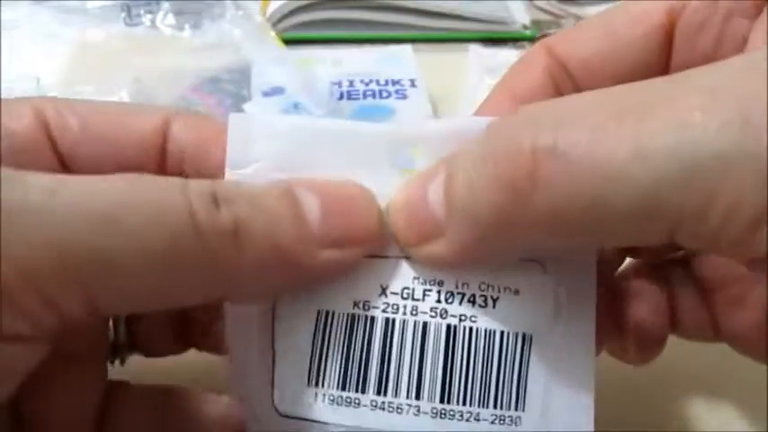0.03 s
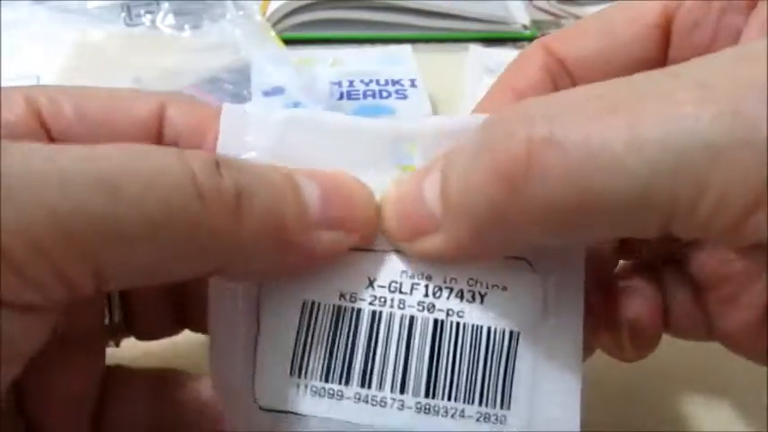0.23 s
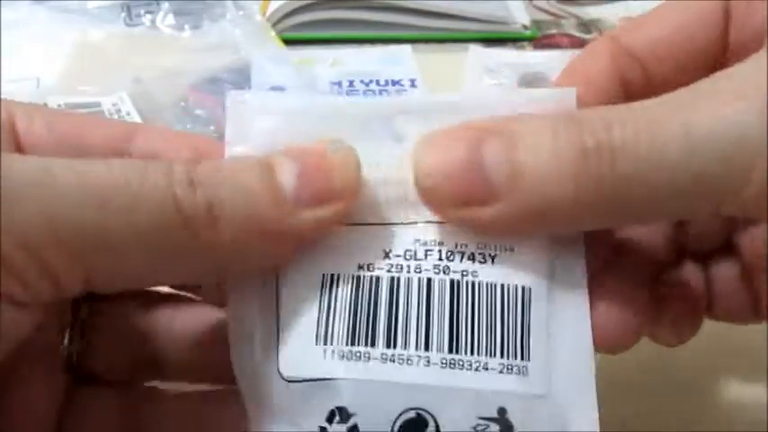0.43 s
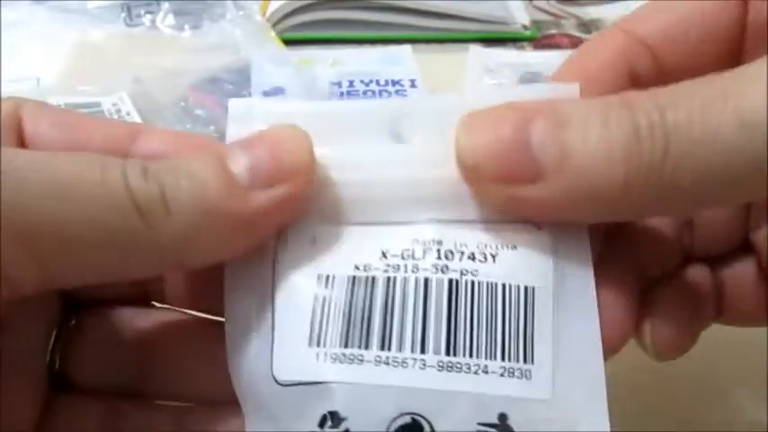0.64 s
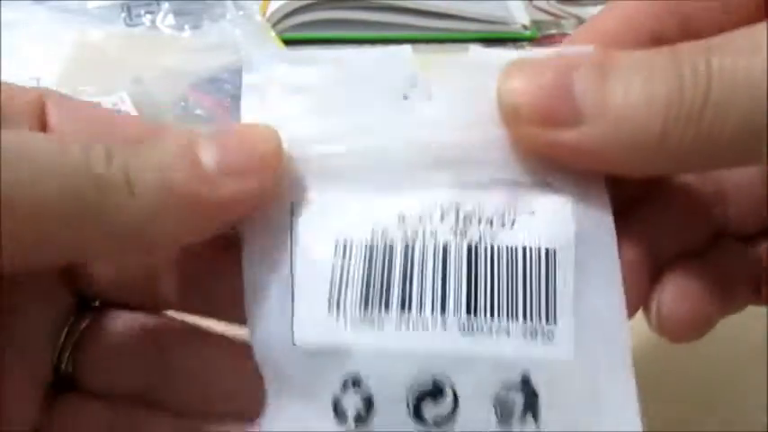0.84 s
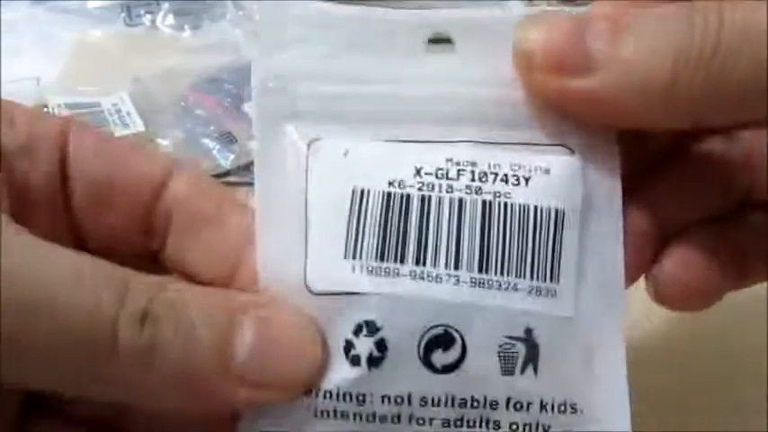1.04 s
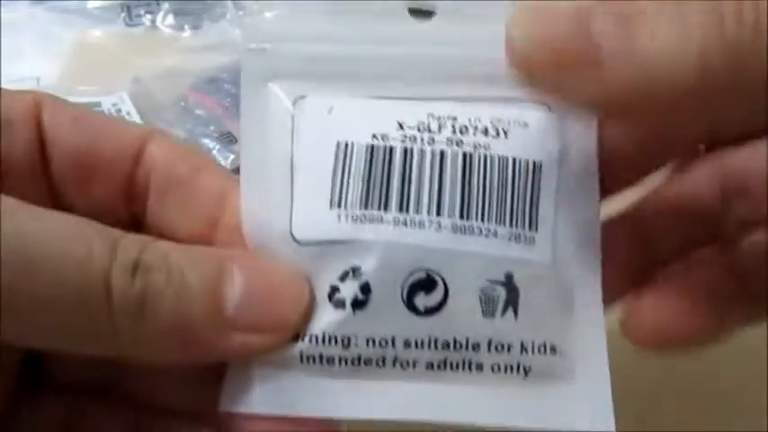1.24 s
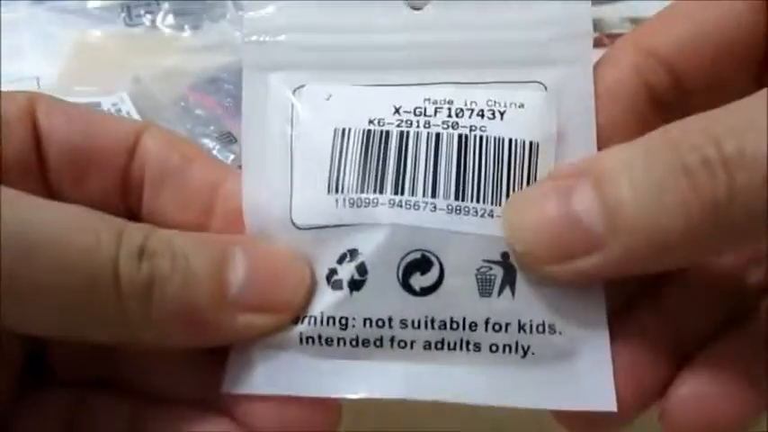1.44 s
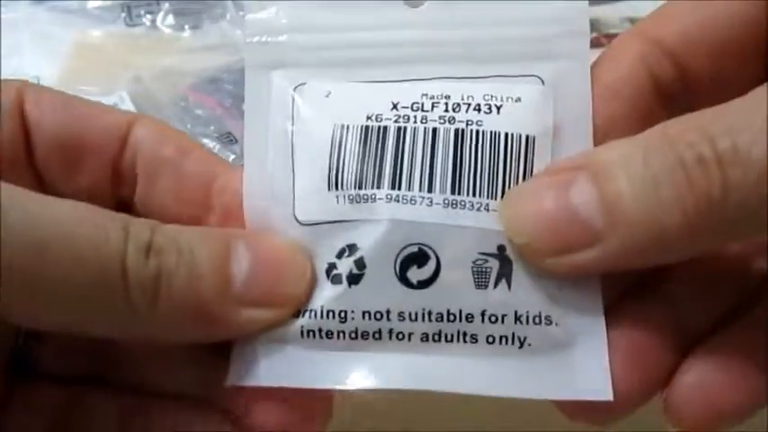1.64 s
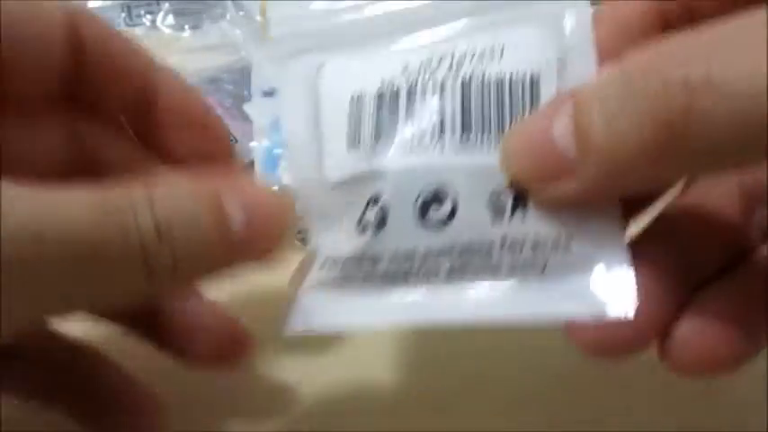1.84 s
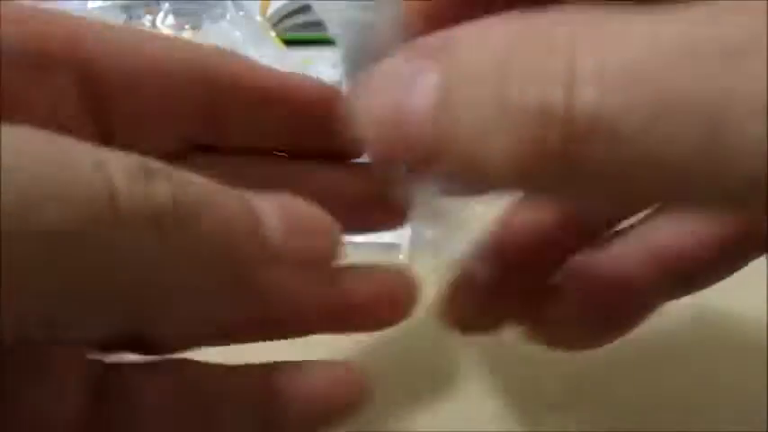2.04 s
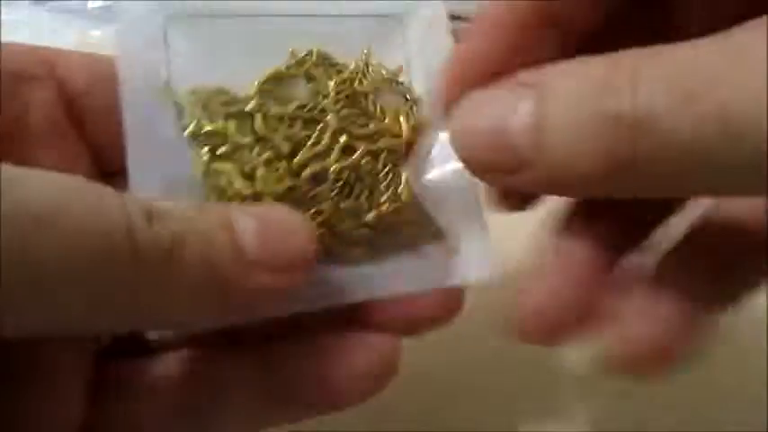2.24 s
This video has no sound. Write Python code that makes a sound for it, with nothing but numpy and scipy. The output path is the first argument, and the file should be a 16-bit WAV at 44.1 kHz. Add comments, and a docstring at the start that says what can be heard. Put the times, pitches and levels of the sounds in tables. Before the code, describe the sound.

Close, scattered snaps come from a stiff plastic packet being handled in a small room with a faint hum. They thin to light ticks, then swell into crinkling as it is flipped and a fine chain shifts inside.

```python
"""A small plastic zip packet is pressed close to the microphone: its stiff film buckles, releasing
elastic energy in sharp snaps and faint ticks. Then the hands turn it over, with dense crinkling,
rubbing fingers, a soft bump and the glint of a fine chain whose links collide inside.
A small room hums faintly and answers the snaps with a bright reverberation."""
import sys
import numpy as np
from scipy import signal
from scipy.fft import rfft, irfft, next_fast_len
from scipy.io import wavfile
from scipy.ndimage import uniform_filter1d, map_coordinates

SR = 44100
rng = np.random.default_rng(int(sys.argv[2]) if len(sys.argv) > 2 else 0)


def put_to_file(sound):
    """Save the sound as 16-bit audio at rate SR, in the file named by the first command-line argument."""
    columns = np.atleast_2d(sound).T  # one column per channel
    safe = np.clip(columns, -1, 1)
    whole_steps = np.round(safe * 32767)
    wavfile.write(sys.argv[1], SR, whole_steps.astype(np.int16))


N = 105840
TIME = np.arange(N) / SR


def amp(db):
    """Amplitude ratio of a level in decibels."""
    return 10 ** (np.asarray(db) / 20)


def unit(x):
    """Normalisation to rms 1."""
    return x / np.sqrt(np.mean(x ** 2) + 1e-20)


def along(points, hz):
    """Interpolation of (frequency, value) points on a logarithmic frequency axis."""
    freqs, values = np.transpose(points)
    return np.interp(np.log(hz + 1), np.log(freqs + 1), values)


def envelope(points):
    """Amplitude envelope through (time, level) points, linear in decibels."""
    return amp(np.interp(TIME, *np.transpose(points), left=-100))


def filtered(x, response):
    """Linear filtering: the spectrum is multiplied by a frequency response."""
    size = next_fast_len(N + SR // 2)
    return irfft(rfft(x, size) * response(np.fft.rfftfreq(size, 1 / SR)), size)[:N]


def minimum_phase(x, gain_db, size=4096):
    """Causal filtering: folding the cepstrum gives the minimum-phase response for gain_db(hz)."""
    cepstrum = irfft(np.log(amp(gain_db(np.fft.rfftfreq(size, 1 / SR)))))
    cepstrum[1:size // 2] *= 2
    cepstrum[size // 2 + 1:] = 0
    return signal.fftconvolve(x, irfft(np.exp(rfft(cepstrum))))[:N]


def noise(spectrum):
    """Spectrally shaped Gaussian noise, rms 1."""
    return unit(filtered(rng.standard_normal(N), lambda hz: amp(along(spectrum, hz))))


# spectrum of the room's background (frequency [Hz], gain [dB])
AIR_SPECTRUM = [(20, -19), (65, 3.5), (130, 0.5), (200, 0.5), (320, -3.5), (450, -13.5), (620, -16),
                (790, -15.5), (910, 4), (1060, -13), (1700, -11.5), (3500, -18.5), (9000, -20),
                (13000, -30), (16000, -34)]


def room_tone(air_db=-57.5, hum_hz=125.3, hum_db=-64.5):
    """Ambient noise: faint fan-like air and a hum with slight random phase modulation."""
    knots_per_s = 6.3
    knots = rng.standard_normal(int(N * knots_per_s / SR) + 4)
    drift = map_coordinates(knots, [TIME * knots_per_s])
    hum = unit(np.sin(2 * np.pi * hum_hz * TIME + .4 * drift))
    return amp(air_db) * noise(AIR_SPECTRUM) + amp(hum_db) * hum


# envelope of the hands' rumble (time [s], level [dB])
RUMBLE_LEVELS = [(0, -53), (.4, -87), (.85, -59), (1.3, -59.5), (1.75, -57.5), (2.0, -51.5), (2.4, -50)]
# its spectrum (frequency [Hz], gain [dB])
RUMBLE_SPECTRUM = [(20, -12), (65, 2), (130, 7.5), (200, -2.5), (330, -2.5), (500, -11), (900, -37.5)]


def hand_rumble():
    """Handling noise: the moving hands make a soft low-frequency rumble."""
    return envelope(RUMBLE_LEVELS) * noise(RUMBLE_SPECTRUM)


# reflections from the table and things around it (delay [s], gain [dB])
NEAR_ECHOES = [(.0036, -17.5), (.0082, -21.5), (0.0162, -26), (.0215, -27), (0.0296, -27.5)]
# reverberation time (frequency [Hz], T60 [s])
ROOM_T60 = [(200, 0.34), (900, 0.16), (2200, 0.68), (7000, 0.55), (11000, .34), (15000, 0.42)]
# strength of the diffuse tail (frequency [Hz], gain [dB])
ROOM_SEND = [(100, -99), (350, -7), (700, -29.5), (1500, -14.5), (3000, -18), (6000, -17), (9500, -9),
             (13000, -17), (16000, -14.5)]


def in_room(burst, build_up_s=.004):
    """Reverberation: direct sound, early reflections and a diffuse tail of decaying noise."""
    hz, t, spectra = signal.stft(rng.standard_normal(SR // 2), SR, nperseg=256)
    t60 = along(ROOM_T60, hz)[:, None]
    decay = amp(along(ROOM_SEND, hz)[:, None] - 60 * t / t60)
    decay *= np.sqrt(2 * np.log(1000) / (t60 * SR))  # energy independent of T60
    response = signal.istft(spectra * decay, SR, nperseg=256)[1]
    response *= 1 - np.exp(-np.arange(len(response)) / SR / build_up_s)
    response[:len(burst)] += burst
    for delay, db in NEAR_ECHOES:
        response[round(delay * SR):][:len(burst)] += amp(db) * burst
    return response


def buckle(spread_s=.0007, ring_t60_s=.012, ring_db=1.5, ring_above_hz=1100, size=2048):
    """Dispersion: a bending wave arrives treble first, and the film rings briefly."""
    t, hz = np.arange(size) / SR, np.fft.rfftfreq(size, 1 / SR)
    delay = spread_s * (1 - np.sqrt(hz / hz[-1]))
    wave = np.exp(-2j * np.pi * np.cumsum(delay) * hz[1])
    ring = unit(rng.standard_normal(size) * amp(-60 * t / ring_t60_s)) / np.sqrt(size)
    high_pass = (1j * hz / (ring_above_hz + 1j * hz)) ** 2
    spectrum = wave + amp(ring_db) * rfft(ring) * high_pass
    smoothed = np.sqrt(uniform_filter1d(abs(spectrum) ** 2, 45))
    return irfft(spectrum / smoothed)[:size // 2]  # spectrally even


# buckles of the film (time [s], patch resonance [Hz], resonance height [dB],
# thud [dB], body [dB], crack [dB], sizzle [dB])
SNAPS = [(0.0534, 2100, 3, -0.5, 18, -2.5, -0.5), (0.0883, 12620, 6, 11.5, 4, 12.5, 20),
         (0.3106, 7080, 3, -45, -2, -2, -4.5), (0.3257, 6280, 7.5, -1, 5, 8.5, 12),
         (0.3377, 3770, 3.5, -58, -1, -12, -26), (0.3496, 6200, 7, -41, -0.5, -10.5, -14),
         (0.6577, 1074, 11.5, -17, -13.5, -38, -27), (0.727, 7170, 5.5, -12.5, 3.5, 8.5, 9),
         (0.7385, 1020, 8.5, -6.5, 3.5, -22, -18), (0.9197, 1026, 6, -10.5, -20, -33, -25),
         (0.932, 1510, 11.5, -11, 1.5, -1.5, -3), (1.079, 1366, 7.5, -18, -17, -49.5, -42),
         (1.1805, 1550, 7, -3.5, -16.5, -19, -21), (1.3424, 1590, 4.5, -23, -33.5, -30, -35.5),
         (1.4305, 1830, 5.5, -34.5, -20.5, -25, -23), (1.5282, 1790, 3.5, -12, -25, -32, -42),
         (1.601, 1720, 0, -31, -16, -28, -26.5), (1.7839, 3640, -2.5, -32, -7, -8.5, -14),
         (1.813, 3650, 3, -37, -8.5, -12.5, -21), (1.822, 1530, 5.5, -32, 5.5, -29, -18),
         (1.9982, 1480, 5, -18, 0, -7.5, -18), (2.0028, 2860, 14, 0, -12, -6, -8),
         (2.0356, 1830, 2, -16, 5, -11, -17), (2.063, 1770, 0, -19, 2.5, -13.5, -12),
         (2.08, 2160, 5, 10, 8, 8, 6), (2.0957, 1420, 5.5, 6.5, 17.5, -14, -29),
         (2.107, 2100, 10.5, 5.5, 7, 4.5, -12), (2.1174, 3780, 14, 10.5, -9.5, 1.5, -4),
         (2.1451, 3740, 8.5, 4.5, 4.5, -3.5, -31), (2.218, 3660, 7.5, -7.5, -4, -16, -29),
         (2.3045, 1640, 8, -4, -2.5, -9, -52), (2.3389, 1390, 5, -3.5, 0.5, -13, -27),
         (2.3437, 1330, 8.5, -1.5, -3, -35, -33)]
# centres of thud, body, crack and sizzle (frequency [Hz])
SNAP_BANDS = [420, 1700, 5500, 11500]
# colour common to all snaps (frequency [Hz], gain [dB])
FILM_SPECTRUM = [(30, -6.5), (130, -4.5), (350, 3), (500, -1.5), (800, -4.5), (1100, 1), (1600, 1.5),
                 (2200, 2), (2550, 3.5), (3000, -1.5), (3700, 6), (4500, 2.5), (7000, 2.5), (10000, -0.5),
                 (13000, -2.5), (16000, -15.5)]


def snaps(half_width_hz=68, widening=.055):
    """Snap-through buckling: each patch of film flips, resonates at its own pitch and excites the room."""
    out = np.zeros(N + SR)
    for start, patch_hz, patch_db, *band_db in SNAPS:
        def colour(hz):
            detuning = (hz - patch_hz) / (half_width_hz + widening * patch_hz)
            balance = along(list(zip(SNAP_BANDS, band_db)), hz)
            return balance + along(FILM_SPECTRUM, hz) + patch_db / (1 + detuning ** 2)

        snap = minimum_phase(in_room(buckle()), colour)
        out[round(start * SR):][:len(snap)] += snap
    return out[:N]


def creases(per_s, spread_db, spectrum):
    """Shot noise: tiny buckles of random size at random moments, rms 1."""
    sizes = amp(spread_db * np.minimum(rng.exponential(size=N), 4)) * rng.choice([-1, 1], N)
    impulses = sizes * (rng.random(N) < per_s / SR)
    return unit(minimum_phase(impulses, lambda hz: along(spectrum, hz)))


# fingertips shift their grip (centre time [s], half length [s], level [dB])
SLIDES = [(0.054, 0.016, -59), (0.88, 0.011, -48.5), (1.022, .015, -54), (1.182, 0.013, -56),
          (1.264, .005, -59.5), (1.342, 0.0077, -59.5), (1.533, 0.0051, -53), (1.565, 0.0075, -56.5),
          (1.948, 0.034, -53.5)]
# spectrum of a stroke (frequency [Hz], gain [dB])
SLIDE_SPECTRUM = [(200, -14.5), (900, -4), (1900, 5.5), (3000, 0.5), (6000, -3), (10000, -6), (13500, -4),
                  (16000, -21)]


def finger_slides():
    """Sliding friction: fingertips cross the film in short grainy strokes."""
    strokes = sum(amp(db) * np.exp(-((TIME - centre) / half) ** 2) for centre, half, db in SLIDES)
    return strokes * creases(per_s=1840, spread_db=2.5, spectrum=SLIDE_SPECTRUM)


# fingers push the packet (time [s], level [dB])
BUMPS = [(0.086, -48), (.323, -52), (0.671, -43.5), (2.109, -23), (2.331, -60)]
# modes of packet and hand together (frequency [Hz], level [dB], T60 [s])
BUMP_MODES = [(65.6, 1.5, 0.085), (139, -6, 0.049), (367, -9.5, 0.036)]


def bumps(attack_s=.0047):
    """Damped oscillation: soft pushes rock the whole packet in the hand."""
    t, out = np.arange(SR // 5) / SR, np.zeros(N + SR)
    push = sum(amp(db - 60 * t / t60) * np.sin(2 * np.pi * hz * t) for hz, db, t60 in BUMP_MODES)
    push *= 1 - np.exp(-t / attack_s)
    for start, db in BUMPS:
        out[round(start * SR):][:len(t)] += amp(db) * push
    return out[:N]


# envelope of crumpling and rubbing (time [s], level [dB])
CRUMPLE_LEVELS = [(1.76, -70.5), (1.795, -48), (1.815, -41.5), (1.85, -53), (1.92, -69.5), (1.94, -90),
                  (1.993, -44), (2.0, -34.5), (2.035, -34.5), (2.055, -41.5), (2.09, -37.5), (2.114, -20),
                  (2.13, -31.5), (2.16, -39), (2.205, -45.5), (2.24, -33.5), (2.26, -51), (2.29, -52),
                  (2.315, -46.5), (2.341, -32.5), (2.36, -53.5), (2.4, -55)]
# spectrum of both (frequency [Hz], gain [dB])
CRUMPLE_SPECTRUM = [(40, 0.5), (130, -6), (350, 1.5), (700, -0.5), (1100, 1), (1700, 7.5), (2800, 0.5),
                    (3700, 1.5), (5000, -5), (6300, -2), (11000, -9), (13800, -7), (16000, -25)]


def crumpling(crease_db=-2.5, rub_db=-3):
    """Buckling and friction: the film creases densely and rubs as the packet is turned."""
    crinkle = amp(crease_db) * creases(per_s=900, spread_db=3, spectrum=CRUMPLE_SPECTRUM)
    rub = amp(rub_db) * noise(CRUMPLE_SPECTRUM)
    return envelope(CRUMPLE_LEVELS) * (crinkle + rub)


# modes of a fine metal link (frequency [Hz], level [dB])
LINK_MODES = [(6120, -1), (7120, -13), (8650, -11), (12400, -1.5), (13300, -4), (13800, -1)]
# envelope of the sliding chain (time [s], level [dB])
CHAIN_LEVELS = [(1.78, -75), (1.815, -56.5), (1.85, -73.5), (1.99, -69.5), (2.003, -39), (2.06, -44.5),
                (2.12, -36), (2.16, -52), (2.245, -50.5), (2.28, -68), (2.34, -58), (2.4, -72)]


def chain(hits_per_s=90, t60_s=.03, detune=.012, count=400):
    """Impact excitation: slightly unequal links collide at random and ring in their natural modes."""
    t, out = np.arange(SR // 12) / SR, np.zeros(N + SR)
    hz, db = np.transpose(LINK_MODES)[:, :, None]
    draws = rng.standard_normal((count, 2, len(LINK_MODES), 1))
    times = np.cumsum(rng.exponential(1 / hits_per_s, count))
    for start, (offset, strength) in zip(times[times < N / SR], draws):
        link_hz = hz * (1 + detune * offset)
        modes = strength * amp(db - 60 * t / t60_s) * np.sin(2 * np.pi * link_hz * t)
        out[round(start * SR):][:len(t)] += modes.sum(0)
    return envelope(CHAIN_LEVELS) * unit(out[:N])


def scene():
    """Superposition: handling sounds convolved with the room's response, snaps and room tone."""
    handling = crumpling() + chain() + hand_rumble() + finger_slides() + bumps()
    rustle = signal.fftconvolve(handling, in_room(np.ones(1)))[:N]
    return (snaps() + rustle + room_tone())[None]


def record(dry):
    """Transduction: a notch in the microphone's response, then clipping and a steep low-pass."""
    notch_hz, width_hz, depth = 4860, 1270, .81
    ceiling, cutoff_hz = .9, 15950

    def notch(hz):
        damping = 1j * hz * width_hz
        return 1 - depth * damping / (notch_hz ** 2 - hz ** 2 + damping)

    clipped = np.clip(filtered(dry[0], notch), -ceiling, ceiling)
    return filtered(clipped, lambda hz: 1 / np.sqrt(1 + (hz / cutoff_hz) ** 160))[None]


dry = scene()
out = record(dry)
put_to_file(out)
```